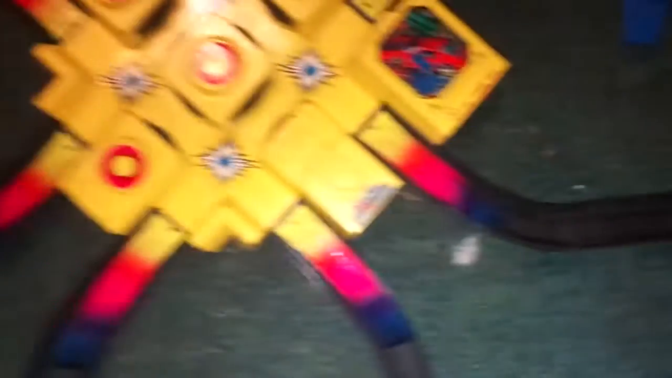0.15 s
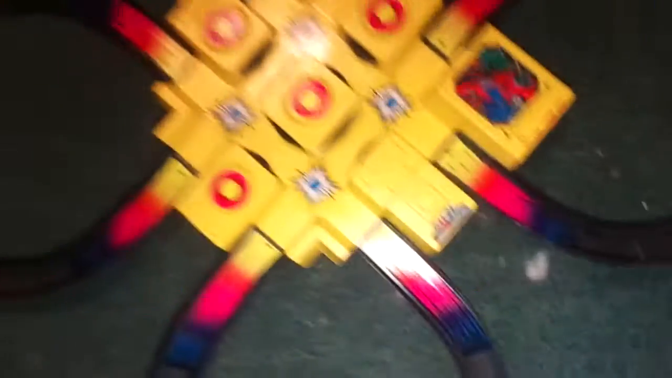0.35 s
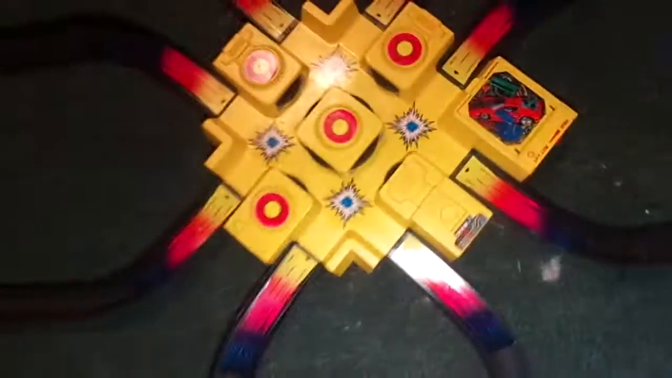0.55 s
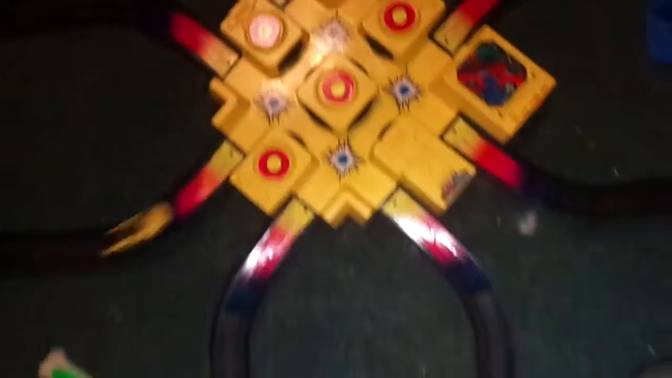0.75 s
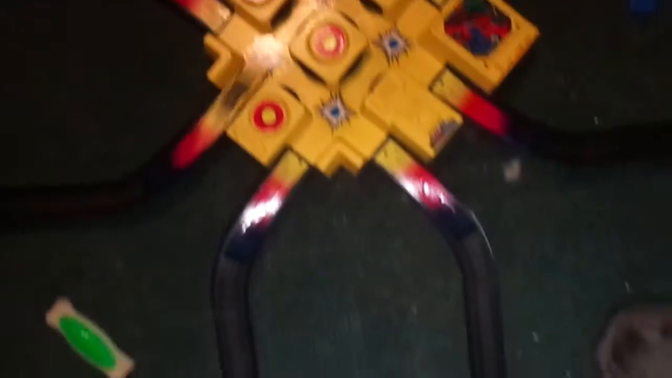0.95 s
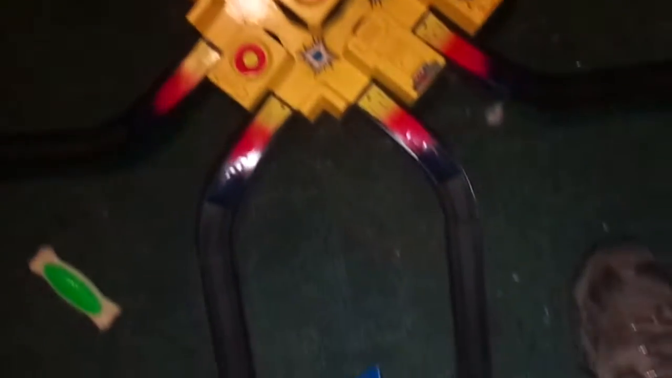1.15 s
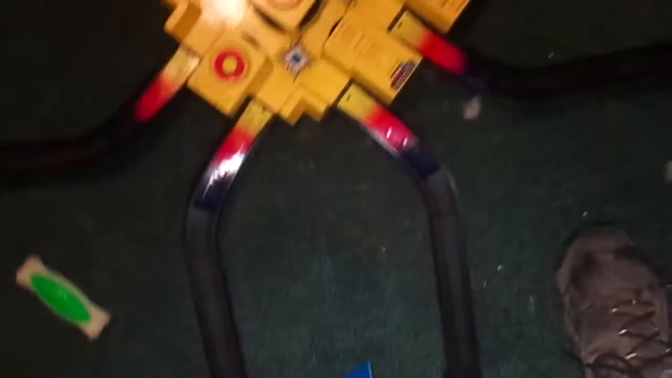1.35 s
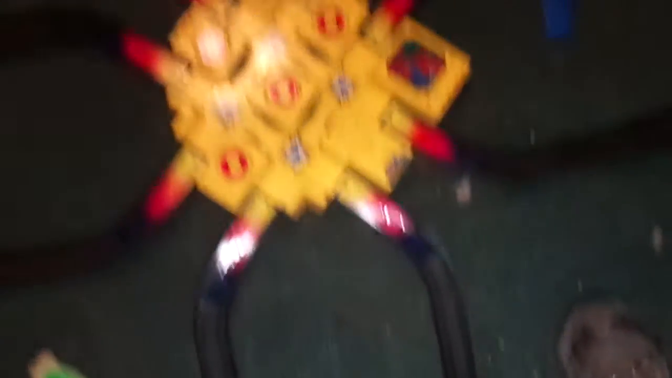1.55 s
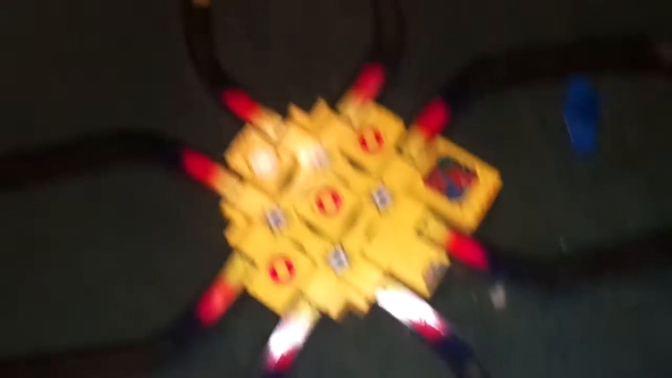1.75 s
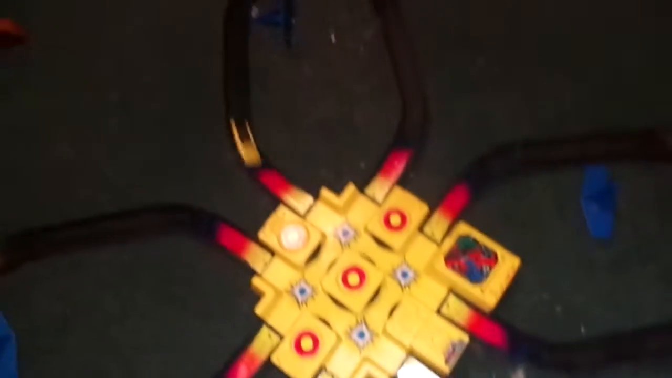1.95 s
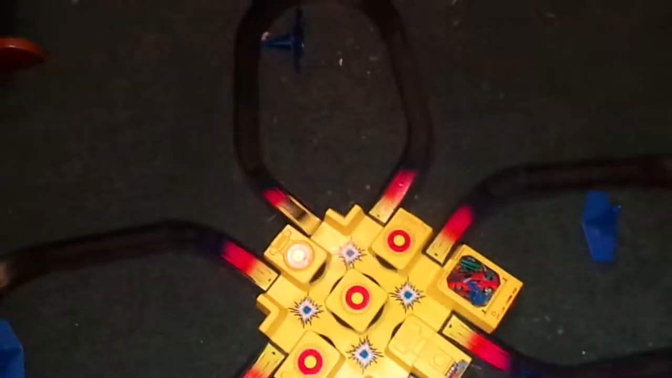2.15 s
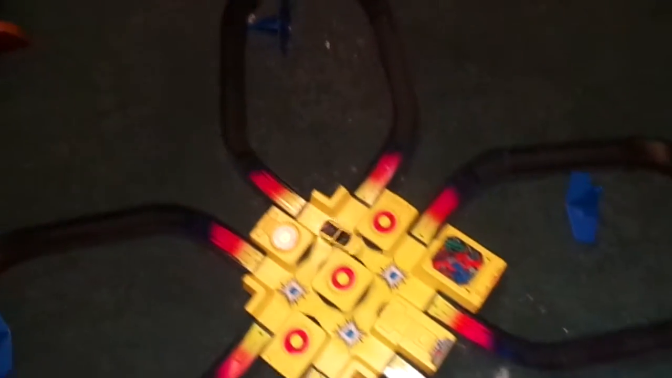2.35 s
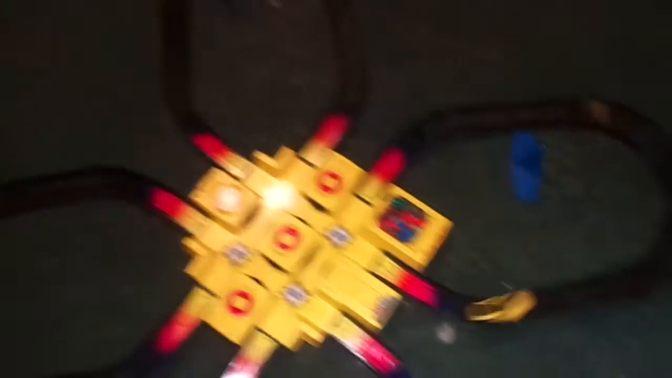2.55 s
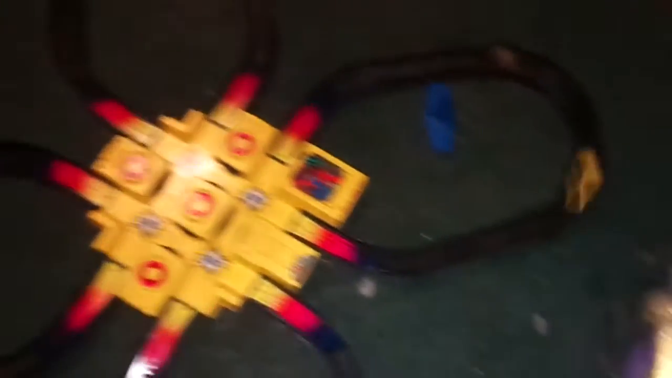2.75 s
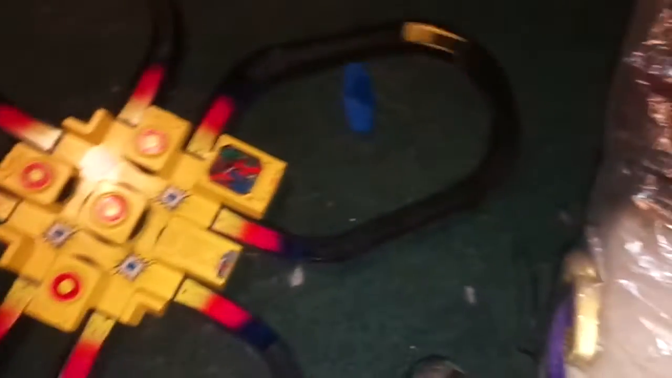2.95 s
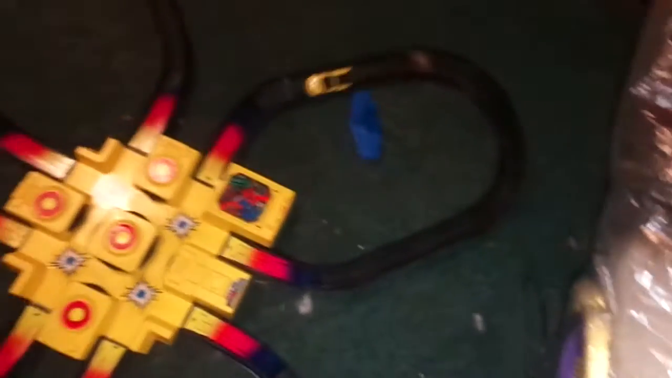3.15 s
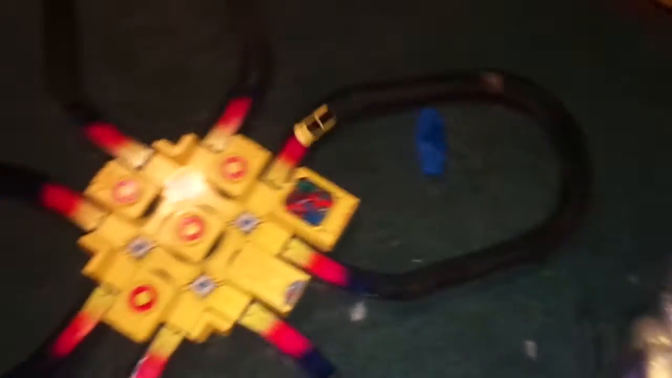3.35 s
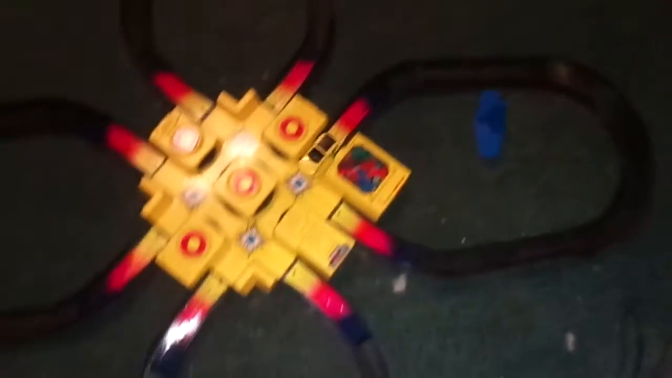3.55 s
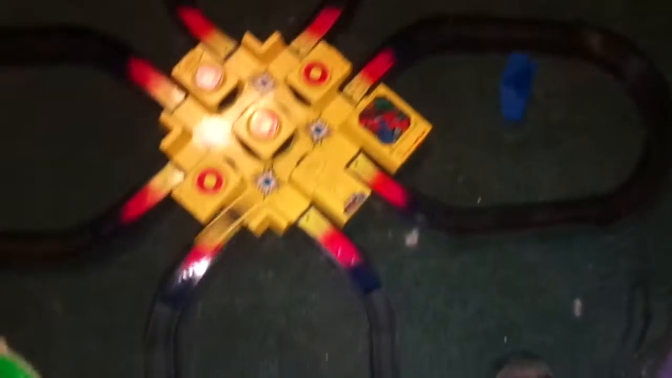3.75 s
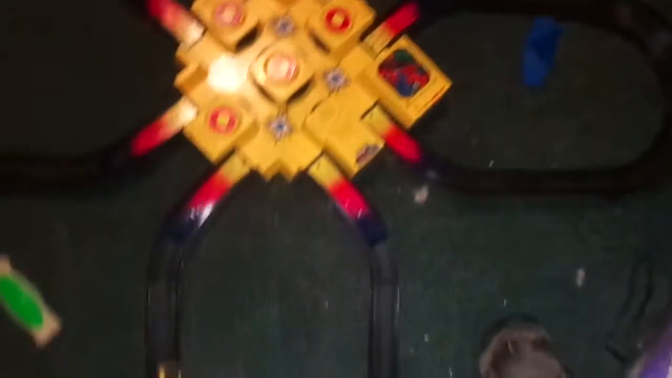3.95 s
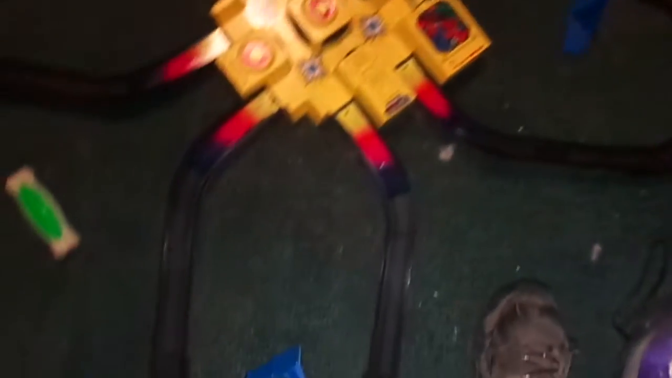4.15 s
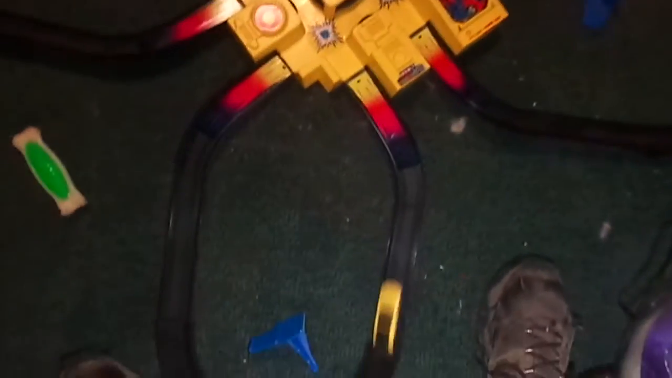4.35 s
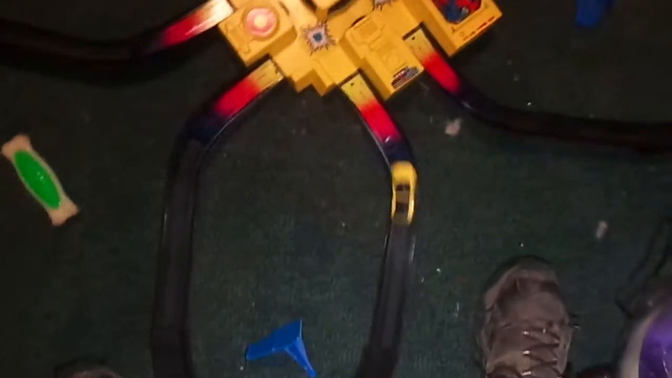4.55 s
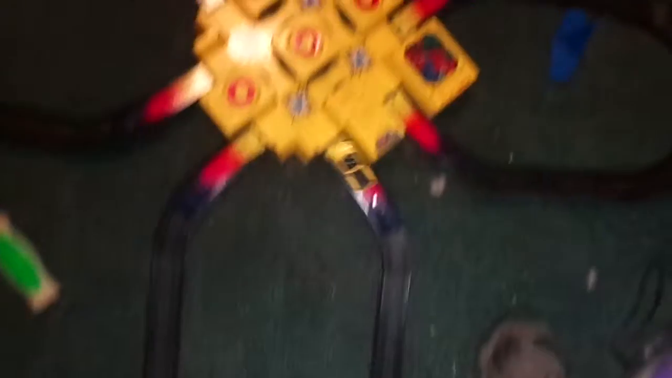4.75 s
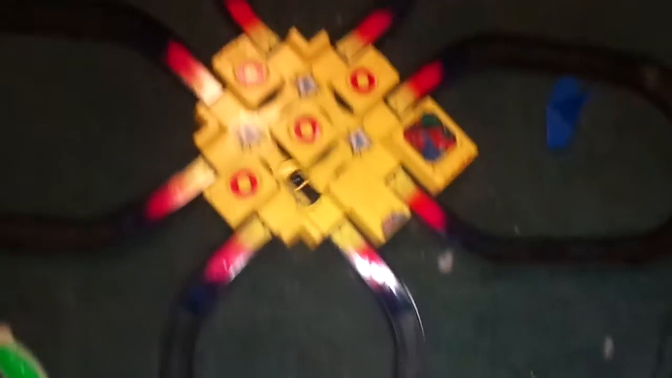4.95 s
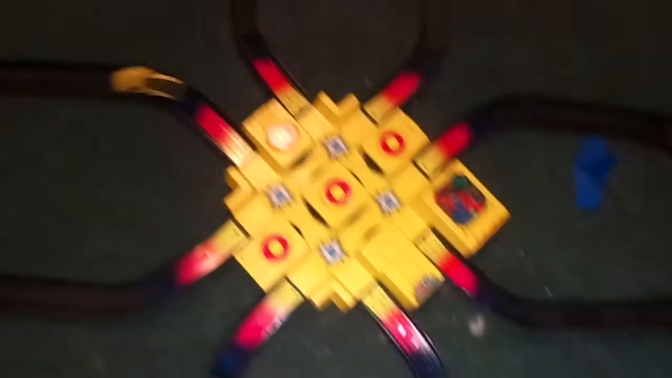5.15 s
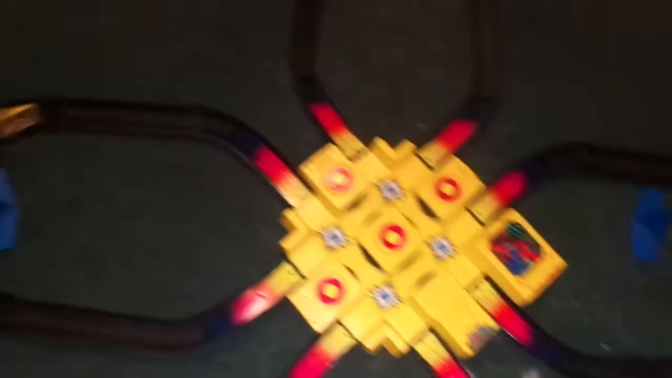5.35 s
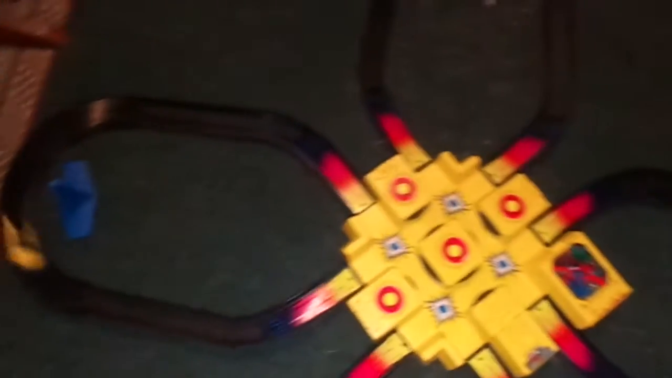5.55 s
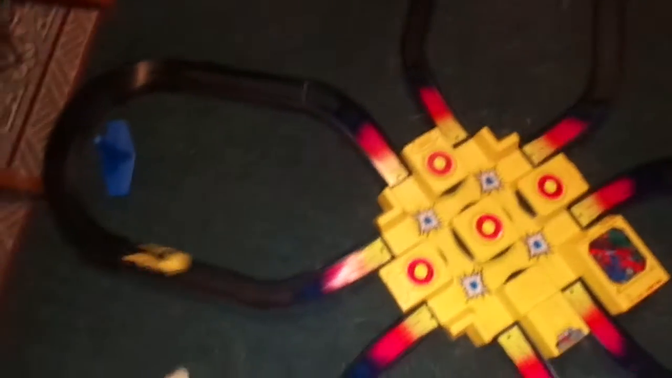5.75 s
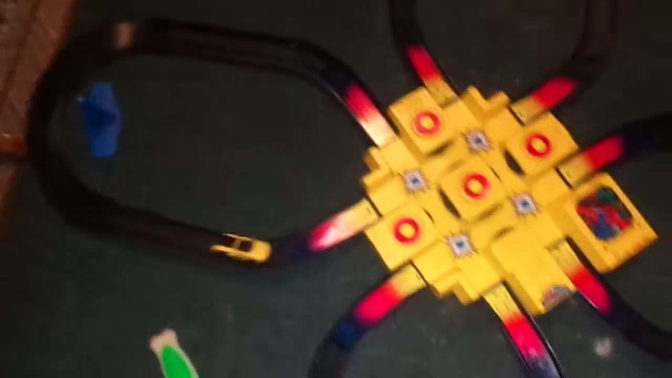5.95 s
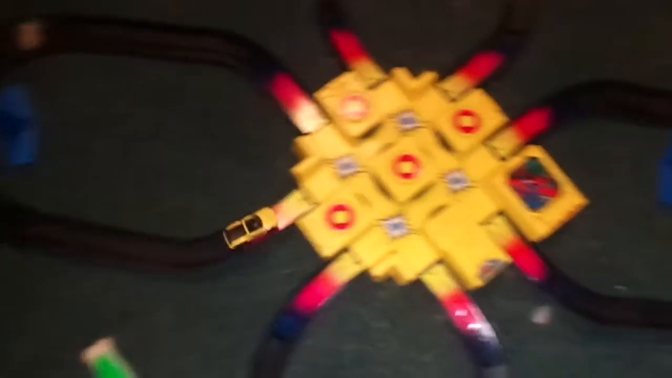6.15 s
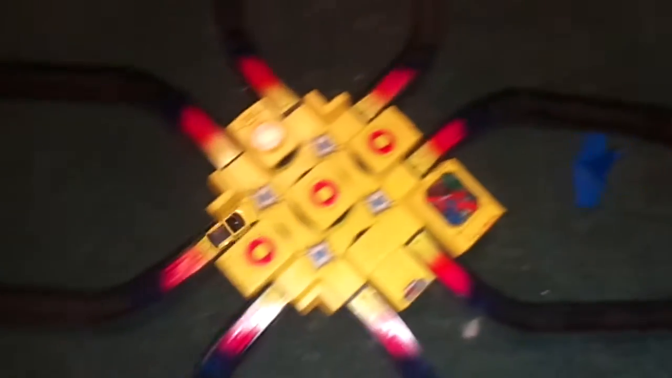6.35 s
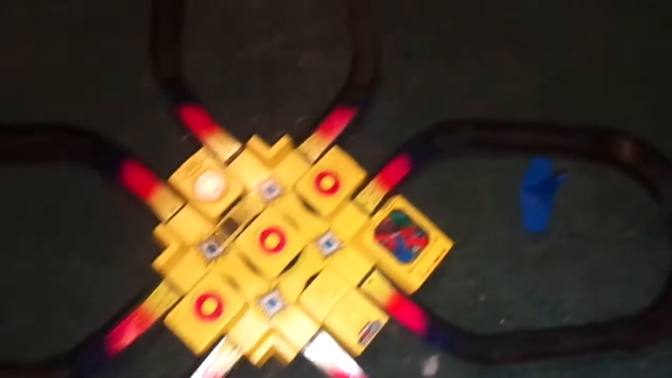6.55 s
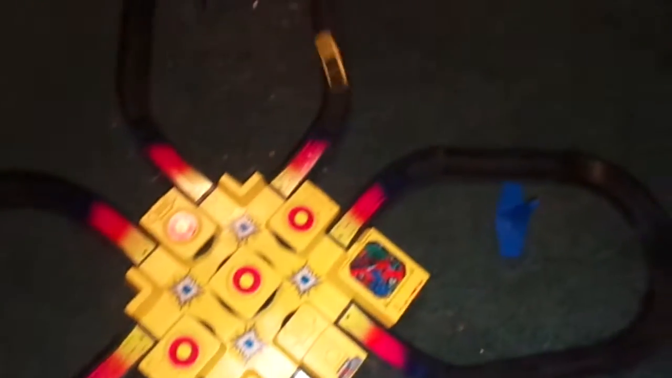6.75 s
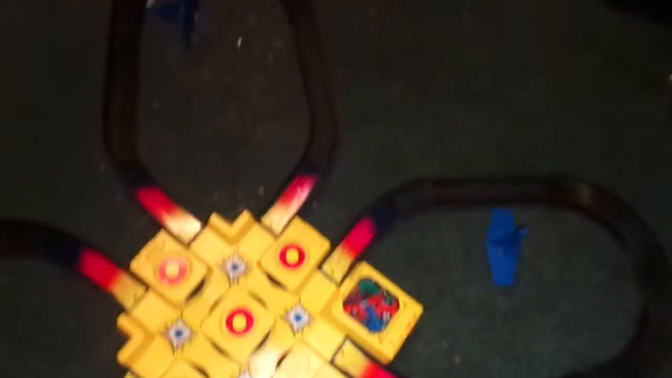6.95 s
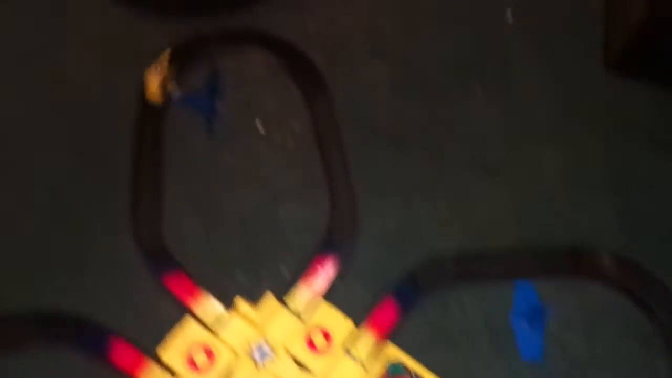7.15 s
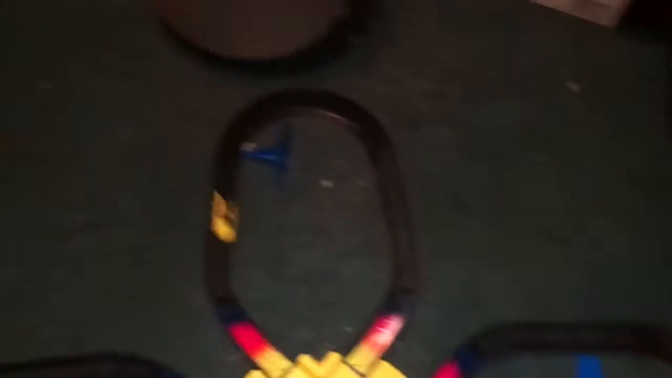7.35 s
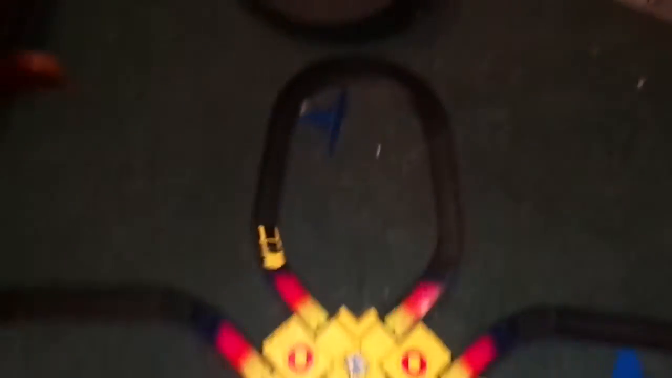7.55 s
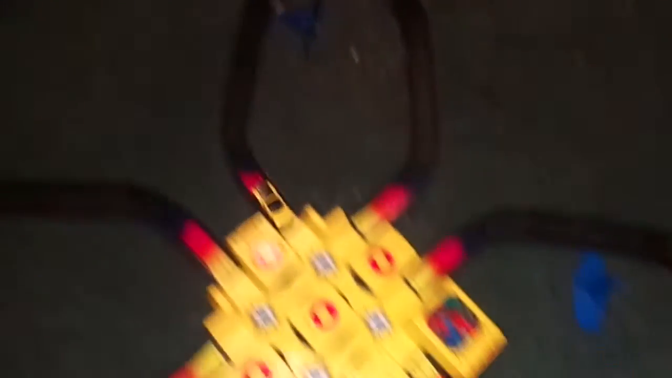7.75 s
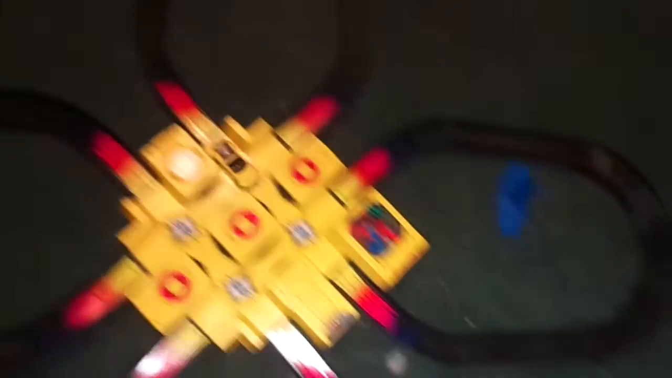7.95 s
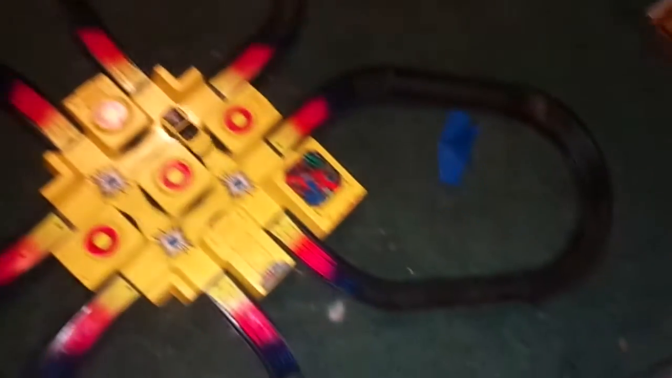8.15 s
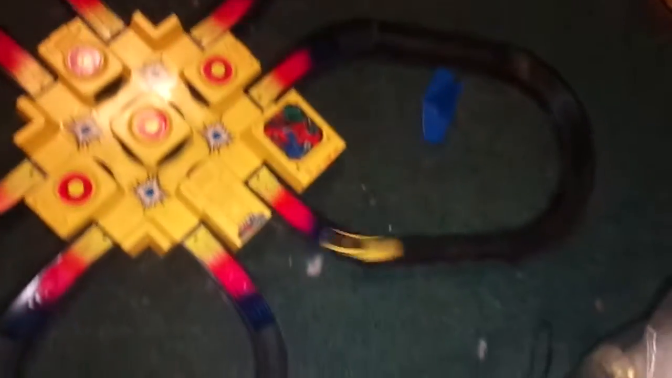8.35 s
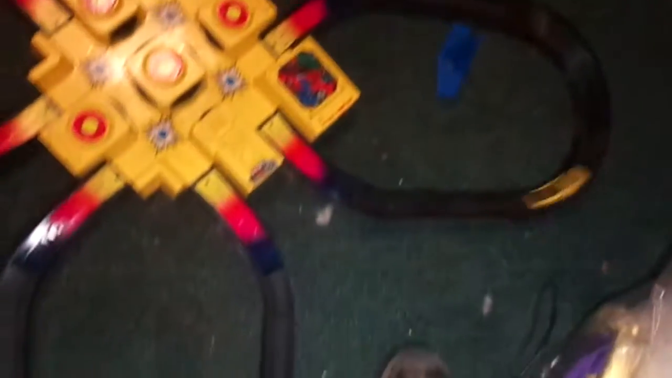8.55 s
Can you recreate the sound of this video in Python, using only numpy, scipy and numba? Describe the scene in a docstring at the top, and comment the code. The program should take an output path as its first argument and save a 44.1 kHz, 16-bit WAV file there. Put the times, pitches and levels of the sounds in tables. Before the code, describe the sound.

A plastic toy track hub whirs throughout, a gritty mid-pitched gear rattle with a wavering motor tone, quick throbbing, loose irregular ticking and faint low floor thrum. A small hard-wheeled car is already shooting out at 0 s, with dense clacks until 0.3 s and another at 0.5 s. It returns and is launched again around 1.1, 2.4, 3.7, 5.0, 6.6 and 8.0 s. Each pass brings a brief surge from the gears, a cluster of sharp plastic knocks, then ringing, scraping clatter and bright wheel hiss round the bend; this thins during the coast home, leaving mostly whir. Tiny metallic pings touch about 2.5 and 3.8-4.0 s. Launches near 1.1, 3.7 and 8.3 s include especially hard clacks; the 6.6 s one is softer. The sound ends mid-lap at about 8.6 s. Close handheld microphone, dull carpeted room, short faint reverberation.

```python
"""Carpeted room: a battery-driven hub of a toy car track whirs, heard by a hand-held phone above it.
Hub: random gear knocks ring the plastic housing, plus mesh-tone sines, loose ticks and floor thrum.
Car: one die-cast car is flung round the loops; knock noise drives moving rings, chatter and hiss.
Clacks over joints and drive wheels are bursts through fixed modes; metal pings are fading sines.
"""
import sys
import numpy as np
from scipy import signal
from scipy.fft import rfft, irfft, next_fast_len
from scipy.io import wavfile
from scipy.ndimage import uniform_filter1d
from numba import njit

SR = 44100
rng = np.random.default_rng(int(sys.argv[2]) if len(sys.argv) > 2 else 0)


def unload_wav(signal):
    """Save mono or channel-first audio to the path in sys.argv[1] as 16-bit WAV at rate SR, clipped to [-1, 1]."""
    wavfile.write(
        sys.argv[1],
        SR,
        np.round(np.clip(np.atleast_2d(signal).T, -1, 1) * 32767).astype(np.int16),
    )


N = 380141
SMOOTH_S = 0.005  # smoothing window of lap-driven levels


def undb(db):
    """Amplitude factor from dB."""
    return 10 ** (np.asarray(db) / 20)


def level(x, db):
    """Set the rms to db."""
    return x * undb(db) / np.sqrt(np.mean(x ** 2))


def curves(table):
    """Columns joined by straight lines in time."""
    s, *columns = np.transpose(table)
    return [np.interp(np.arange(N) / SR, s, c) for c in columns]


@njit
def svf(x, hz, width_hz):
    """State-variable band-pass with a moving centre, gain 1 at the centre."""
    y, b, l = np.empty(len(x)), 0., 0.
    for i in range(len(x)):
        g, k = np.tan(np.pi * hz[i] / SR), width_hz / hz[i]
        v = (b + g * (x[i] - l)) / (1 + g * (g + k))
        b, l, y[i] = 2 * v - b, l + 2 * g * v, k * v
    return y


def ring(x, modes):
    """Parallel fixed resonances, alternating in sign, each with its own centre gain."""
    out = 0
    for k, (hz, width_hz, db) in enumerate(modes):
        b, a = signal.iirpeak(hz, hz / width_hz, SR)
        out = out + (-1) ** k * undb(db) * signal.lfilter(b, a, x)
    return out


def colour(x, points):
    """Spectral shaping by (Hz, dB) points on a log frequency axis."""
    hz, db = np.transpose(points)
    size = next_fast_len(len(x))
    f = np.arange(1, size // 2 + 2) * SR / size
    gain = undb(np.interp(np.log(f), np.log(hz), db, -90, db[-1]))
    return irfft(rfft(x, size) * gain, size)[:len(x)]


def walk(rate_hz):
    """Random levels held 1 / rate and slewed twice; spread near 1."""
    k = int(SR / rate_hz)
    held = np.repeat(rng.standard_normal(N // k + 1), k)
    return 1.32 * uniform_filter1d(uniform_filter1d(held, k), k)[:N]


def rattle(rate_hz, spread_db, smear_s):
    """Random knocks of uneven, capped size, each a short scrape of noise; rms 0 dB."""
    size_db = spread_db * np.minimum(rng.exponential(size=N), 3)
    knocks = (rng.random(N) < rate_hz / SR) * undb(size_db)
    energy = signal.lfilter([1], [1, -np.exp(-1 / (smear_s * SR))], knocks ** 2)
    return level(np.sqrt(energy) * rng.standard_normal(N), 0)


# mesh tone: (multiple of MESH_HZ, level/dB before drift)
MESH_ORDERS = [(1, -33), (3, -19), (4, -17.5)]
# plastic housing modes: (f/Hz, width/Hz, relative level/dB)
HOUSING_MODES = [(257, 124, -17.5), (524, 154, -6), (608, 85.6, -0.5), (744, 86, -4.5), (937, 82, -2),
                 (1283, 320, -5), (2250, 460, -8.5), (3835, 980, -14)]
# loose part's ring: (f/Hz, width/Hz, relative level/dB)
TICK_MODE = [(5190, 400, 0)]
# floor-borne spectrum: (f/Hz, relative level/dB per Hz)
THRUM_SPECTRUM = [(20, -34), (50, -19), (70, -13.5), (140, -8), (240, -9.5), (420, -12), (600, -30.5)]
# hub as heard while the phone moves: (t/s, base level/dB, base ticking level/dB)
HUB_DISTANCE = [(0.0, -27, -7), (0.33, -30.5, -3), (1.99, -32.5, -4), (3.74, -31.5, -1.5), (4.18, -33, -3),
                (4.78, -31.5, -1.5), (5.04, -32, 1), (5.47, -32.5, -16), (6.2, -30, 2.5), (6.46, -31, -6),
                (6.74, -30.5, -2), (7.15, -33, -15), (7.51, -33.5, 0.5), (8.62, -30.5, -8)]
MESH_HZ = 239.7
WHEEL_HZ, THROB_DB = 13.6, 1.5  # mean turn rate, throb amplitude
SURGE_HOLD_S, SURGE_FALL_S = 0.05, 0.021  # lap time at stretch 1; fall to 1/e


def hub():
    """Gear teeth knock the housing, the mesh tone wavers, a loose part ticks, the floor thrums."""
    hub_db, tick_db = curves(HUB_DISTANCE)
    mesh_hz = MESH_HZ * (1 + .013 * walk(8) + 0.014 * walk(60))
    phase = 2 * np.pi * np.cumsum(mesh_hz) / SR
    tone = 0
    for multiple, db in MESH_ORDERS:
        order_db = db + 5 * np.tanh(walk(25)) + 4 * np.tanh(walk(6))
        tone = tone + undb(order_db) * np.sin(multiple * phase)
    teeth = rattle(1000, 3.2, 0.0025) * undb(1.1 * walk(20))

    clicks = ticks(70, .55, 3) * undb(tick_db + 2.5 * walk(7))
    ringing_ticks = level(ring(ring(clicks, TICK_MODE), TICK_MODE), -32.5)
    buzz = undb(tick_db) * level(ring(ring(teeth, TICK_MODE), TICK_MODE), -34)
    loose = ringing_ticks + buzz + level(ring(clicks, HOUSING_MODES[5:]), -29.5)
    thrum = colour(rng.standard_normal(N), THRUM_SPECTRUM) * undb(1.6 * walk(15))

    k, since_s = lap()
    fall = np.exp(-np.maximum(since_s - SURGE_HOLD_S, 0) / SURGE_FALL_S)
    surge_db = uniform_filter1d(np.array(LAUNCHES)[k, -1] * fall, int(SMOOTH_S * SR))
    # drive wheels out of round: one throb a turn
    turn = 2 * np.pi * np.cumsum(WHEEL_HZ * (1 + 0.096 * walk(5))) / SR
    load_db = hub_db + surge_db + THROB_DB * np.sin(turn) + 0.82 * walk(8)
    gears = undb(load_db + 3.0) * (level(ring(teeth, HOUSING_MODES), 0) + tone)
    return gears + undb(0.45 * load_db) * (loose + level(thrum, -37.5))


def ticks(rate_hz, uneven, spread_db):
    """A loose part clicks at uneven intervals, now hard, now soft."""
    gap_chance, size_chance = rng.standard_normal((N // 400, 2)).T
    at = np.cumsum(SR / rate_hz * np.exp(uneven * gap_chance)).astype(int)
    out = np.zeros(N)
    out[at[at < N]] = undb(spread_db * size_chance)[at < N]
    return out


# moving rings per piece of track: (t/s, track ring f/Hz, car body ring f/Hz, relative level/dB)
TRACK_RINGS = [(0, 2220, 3650, -23), (.3, 1970, 3470, 5), (.9, 1670, 3800, -7), (1.4, 1960, 3520, 4),
               (1.7, 1970, 3250, 3), (1.78, 1920, 4100, 1), (2.45, 2200, 3200, -1), (2.6, 2170, 3740, -1),
               (2.86, 2100, 3360, 3), (2.94, 1670, 3520, 6.5), (3.08, 1600, 3700, -9),
               (3.3, 2110, 3600, -3), (3.8, 2230, 3350, -6), (4.02, 1900, 3650, -12), (4.05, 1720, 3300, 6),
               (4.29, 1730, 3280, -0.5), (4.38, 1620, 3800, 4.5), (5.05, 2220, 3450, -5),
               (5.37, 1550, 3400, -1), (5.44, 2150, 3280, 8), (5.72, 2080, 3500, -2), (6.8, 2460, 3740, 3),
               (6.97, 1860, 3400, 5), (7.26, 1640, 3800, 5), (8.44, 1510, 3600, -5), (8.62, 2270, 3300, -5)]
# broad track modes: (f/Hz, width/Hz, relative level/dB)
TRACK_MODES = [(1478, 450, 6.5), (2550, 613, 11.5), (2920, 963, 8.5), (4405, 1150, -2.5)]
# wheel hiss spectrum: (f/Hz, relative level/dB per Hz)
HISS_SPECTRUM = [(2650, 2), (4500, 10.5), (5650, 6), (6990, 3.5), (8460, -4), (13100, -10), (14700, -17),
                 (15500, -38)]
TRACK_RING_WIDTH_HZ, BODY_RING_WIDTH_HZ = 310., 370.  # per filter pass, two passes


def car():
    """Hard wheels excite two moving rings; chatter rings the track broadly and hisses."""
    near_db, hiss_db = rolling()
    track_hz, body_hz, ring_db = curves(TRACK_RINGS)
    k, _ = lap()
    body_db = -4.5 + np.array(LAUNCHES)[k, -2]
    rings = 0
    for hz, width_hz, db in ((track_hz, TRACK_RING_WIDTH_HZ, -1.5), (body_hz, BODY_RING_WIDTH_HZ, body_db)):
        once = svf(rattle(1600, 2.5, .002), hz * (1 + .025 * walk(30)), width_hz)
        twice = svf(once, hz * (1 + .012 * walk(12)), width_hz)
        rings = rings + level(twice, 0) * undb(db)
    # louder rolling lifts the rings more than the chatter; less hiss leaves them clearer
    rings = rings * undb(ring_db + 0.56 * (near_db + 16.0) - 0.2 * (hiss_db + 26.5))

    chatter = rattle(1100, 4.5, 0.001)
    # axles and loose parts tinkle: pitch redrawn every 600 samples
    tinkle_hz = np.repeat(rng.uniform(4500, 9500, N // 600 + 1), 600)[:N]
    tinkle = level(svf(rattle(360, 3.8, 0.011), tinkle_hz, 350.0), -10.5)
    hiss = level(colour(chatter, HISS_SPECTRUM), 0) + tinkle
    broad = undb(0.31 * hiss_db) * level(ring(chatter, TRACK_MODES), 0.77)
    jolt_db = 0.9 * walk(35)  # the car rocks and skips on its wheels
    return undb(near_db - 3.0 + jolt_db) * (rings + broad + undb(hiss_db) * hiss)


# launches from the hub: (t/s, time stretch, over-hub offset/dB, bend offset/dB, coast offset/dB,
# wheel hiss offset/dB, car body ring offset/dB, hub surge/dB before smoothing)
LAUNCHES = [(-.05, 0.95, 3, 2.5, 4, 2, -5, 11), (1.063, 0.98, 0.5, 1, 1.8, 1.5, 3, 7),
            (2.401, 1.01, 0, 3.5, 3, -1, 1, 5.5), (3.7, 0.99, 1.5, 3.1, 4, -1.8, -1, 6),
            (4.995, 1.14, -1.5, -0.3, 1.5, 0, -10, 7.5), (6.56, 1.06, -2.6, 1.1, 0.7, 0, -2.5, 5.5),
            (8.016, 1.12, -7, 1.5, 4.5, 2, 6, 2)]


def lap():
    """Index of the running lap and time into it (s at stretch 1)."""
    t = np.arange(N) / SR
    start_s, stretch = np.transpose(LAUNCHES)[:2]
    k = np.maximum(np.searchsorted(start_s, t) - 1, 0)
    return k, (t - start_s[k]) / stretch[k]


# lap shape at stretch 1: (t/s after launch, base level/dB, base wheel hiss level/dB)
LAP_SHAPE = [(0.0, -21, -8.5), (.06, -25.5, -9), (.2, -21.5, -6), (.27, -28.5, -6), (.35, -23.5, -7),
             (.46, -24.5, -14), (.64, -26, -10.5), (.74, -32.5, -7), (.88, -29.5, -10), (1.05, -39, -12),
             (1.25, -33, -9), (1.55, -59, -35)]
LEAVES_HUB_S, LEAVES_BEND_S, BLEND_S = 0.236, 0.446, 0.031  # at stretch 1


def rolling():
    """One level shape per lap: clatter over the hub, a loud bend, a slow coast home."""
    k, since_s = lap()
    s, near_shape_db, hiss_shape_db = np.transpose(LAP_SHAPE)
    near_db = np.interp(since_s, s, near_shape_db)
    hiss_db = np.interp(since_s, s, hiss_shape_db)
    hub_db, bend_db, home_db, lap_hiss_db = np.array(LAUNCHES)[k, 2:6].T

    def past(at_s):
        """Fade 0 to 1 centred on at_s."""
        return np.clip((since_s - at_s) / BLEND_S + .5, 0, 1)

    near_db = near_db + hub_db + past(LEAVES_HUB_S) * (bend_db - hub_db)
    near_db = near_db + past(LEAVES_BEND_S) * (home_db - bend_db)
    return [uniform_filter1d(c, int(SMOOTH_S * SR)) for c in (near_db, hiss_db + lap_hiss_db)]


# blows: (t/s, base peak level/dB, main ring f/Hz, base treble level/dB, 60 dB burst decay/s, min 0.005)
CLACKS = [(0.019, -7, 2360, -29, 0.029), (0.041, -21, 3770, -14.5, 0.029), (0.06, -17, 805, -20, 0.081),
          (0.087, -19, 3260, -33, 0.022), (0.113, -12.5, 980, -31, 0.088), (0.133, -15, 3680, -19, 0.059),
          (0.202, -18, 2470, -20, 0.028), (0.27, -9.5, 1530, -27, 0.025), (0.28, -4, 2100, -25, 0.038),
          (0.531, -8.5, 1390, -35, 0.046), (0.603, -19, 918, -22, 0.029), (0.75, -14, 1400, -26, 0.044),
          (0.936, -26, 950, -24, 0.05), (1.035, -9, 1200, -33, 0.02), (1.063, -8, 960, -36, 0.043),
          (1.088, -16, 3900, -24, 0.02), (1.104, -12, 3080, -26, 0.032), (1.113, -16, 2600, -13, 0.03),
          (1.133, -21, 2720, -17, 0.05), (1.151, -4.5, 2390, -25, 0.033), (1.231, -13, 3000, -20, 0.064),
          (1.253, -13, 3450, -31, 0.029), (1.271, -19, 3850, -26, 0.025), (1.348, -16, 3570, -25, 0.096),
          (1.383, -13, 1200, -25, 0.067), (1.681, -16.5, 1410, -24, 0.071), (1.954, -17, 1330, -29, 0.023),
          (2.403, -14, 990, -36, 0.02), (2.475, -12.5, 2150, -33, 0.027), (2.49, -11, 2160, -41, 0.034),
          (2.528, -12, 1800, -38, 0.029), (2.577, -10, 2800, -38, 0.035), (2.713, -18, 3370, -24, 0.04),
          (2.776, -14, 3330, -30, 0.023), (3.029, -8, 1370, -30, 0.01), (3.059, -16, 1620, -25, 0.091),
          (3.075, -10.5, 1620, -20, 0.032), (3.281, -14, 2100, -36, 0.04), (3.378, -13.5, 1960, -31, 0.03),
          (3.705, -21, 1320, -41, 0.04), (3.746, -4.5, 2400, -30, 0.018), (3.772, -10, 2320, -17, 0.028),
          (3.794, -10, 2180, -20, 0.044), (3.882, -13, 2000, -25, 0.036), (3.908, -14.5, 1660, -29, 0.1),
          (3.969, -17, 3800, -36, 0.036), (4.014, -28, 2310, -21, 0.03), (4.036, -11, 1590, -28, 0.055),
          (4.53, -15.5, 3170, -29, 0.065), (4.571, -17, 1650, -29, 0.054), (5.006, -9, 2190, -23, 0.038),
          (5.045, -12, 2410, -26, 0.015), (5.074, -10, 2610, -25, 0.043), (5.1, -16, 2640, -19.5, 0.034),
          (5.186, -14.5, 2400, -22, 0.1), (5.29, -22, 3720, -25, 0.031), (5.34, -16, 3160, -25, 0.036),
          (5.362, -12, 1550, -38, 0.049), (5.69, -15, 2000, -41, 0.031), (6.331, -24, 950, -27, 0.064),
          (6.422, -18, 2320, -38, 0.045), (6.556, -27, 1250, -41, 0.022), (6.629, -13, 1360, -24, 0.018),
          (6.647, -11, 2650, -26, 0.041), (6.667, -14, 2000, -22, 0.037), (6.754, -11, 2330, -20, 0.044),
          (6.781, -16, 3550, -20.5, 0.061), (6.817, -14, 2480, -22.5, 0.023),
          (6.914, -17, 3260, -24, 0.062), (7.258, -22, 3860, -23.5, 0.12), (7.837, -16.5, 1360, -32, 0.037),
          (8.018, -8, 1270, -32, 0.03), (8.043, -12, 1040, -24.5, 0.032), (8.102, -14, 4250, -31, 0.018),
          (8.274, -8.5, 2500, -22, 0.059), (8.282, -12.5, 1510, -37, 0.048), (8.307, -5, 2170, -19, 0.0083),
          (8.34, -11, 2080, -26, 0.05), (8.349, -15, 1150, -32, 0.024), (8.389, -15, 3020, -28, 0.043),
          (8.584, -20, 1380, -21.5, 0.045)]
# metal car modes: (f/Hz, width/Hz, relative level/dB)
METAL_MODES = [(4150, 160, -8), (5150, 410, 18), (7220, 320, 4.5)]


def clacks():
    """Each blow, a knock (harder if short) plus scrape, rings track, housing and metal car."""
    out, t = np.zeros(N + 4096), np.arange(4096) / SR
    for (s, db, hz, treble_db, length_s), noise in zip(CLACKS, rng.standard_normal((len(CLACKS), 4096))):
        decay_s = max(length_s, .005)
        knock = 0.02 / decay_s * (t < .0004) * np.sin(2 * np.pi * t / 0.00032)
        envelope = (1 - 0.6 * np.exp(-t / 0.003)) * np.exp(-np.log(1000) * t / decay_s)
        burst = (noise + knock) * envelope
        # (part, peak dB re blow)
        parts = [(ring(burst, TRACK_MODES), -4.5),
                 (ring(burst, [(hz, 240, 0)]), -1.0),
                 (ring(burst, HOUSING_MODES[:6]), -12 + 3.8 * np.log2(2000 / hz)),
                 (colour(burst, HISS_SPECTRUM), treble_db - db + 5.0),
                 (ring(burst, METAL_MODES), treble_db - db - 0.5)]
        i = int(s * SR)
        out[i:i + 4096] += undb(db) * sum(p * undb(d) / np.abs(p).max() for p, d in parts)
    return out[:N]


# metal part of the car: (t/s, peak level/dB, f/Hz)
PINGS = [(2.47, -16, 4750), (3.772, -18, 4970), (3.91, -16, 7000), (3.97, -23, 6940)]
PING_T60_S = .022


def pings():
    """Each struck metal ping is one exponentially fading sine."""
    t = np.arange(N) / SR
    out = np.zeros(N)
    for s, db, hz in PINGS:
        fade = undb(db - 60 * np.maximum(t - s, 0) / PING_T60_S)
        out += fade * (t > s) * np.sin(2 * np.pi * hz * t)
    return out


WET_DB, ROOM_T60_S = -20, .2  # tail energy re direct


def room(dry_toy):
    """Carpeted room: a short, dull noise tail, silent for its first 6 ms."""
    t = np.arange(int(.4 * SR)) / SR
    tail = colour(rng.standard_normal(len(t)), [(100, 11), (3000, 5), (16000, -59.0)])
    tail = tail * (t > .006) * np.exp(-np.log(1000) * t / ROOM_T60_S)
    tail = level(tail, WET_DB) / np.sqrt(len(t))
    return signal.fftconvolve(dry_toy, tail)[:N]


def scene():
    """Toy plus room; one microphone feeds both channels."""
    toy = hub() + car() + clacks() + pings()
    heard = toy + room(toy)
    return np.array([heard, heard])


TOP_HZ = 15100


def record(dry):
    """The phone cuts the top: steep elliptic low-pass."""
    return signal.sosfilt(signal.ellip(10, .2, 80, TOP_HZ, fs=SR, output="sos"), dry)


dry = scene()
out = record(dry)
unload_wav(out)
```